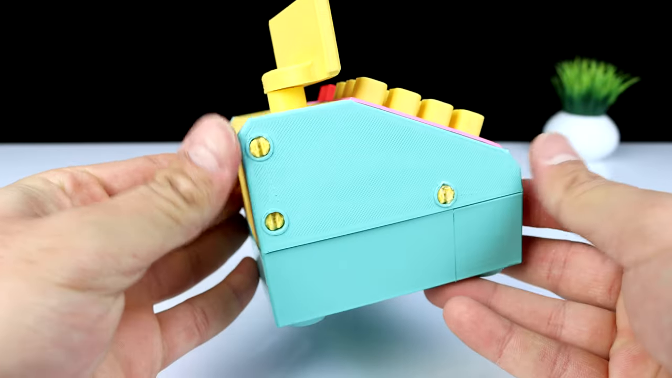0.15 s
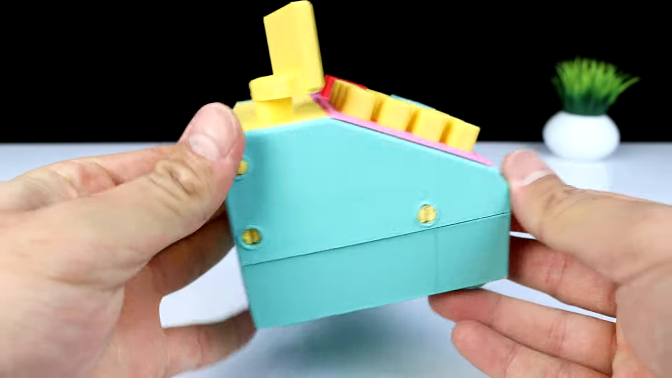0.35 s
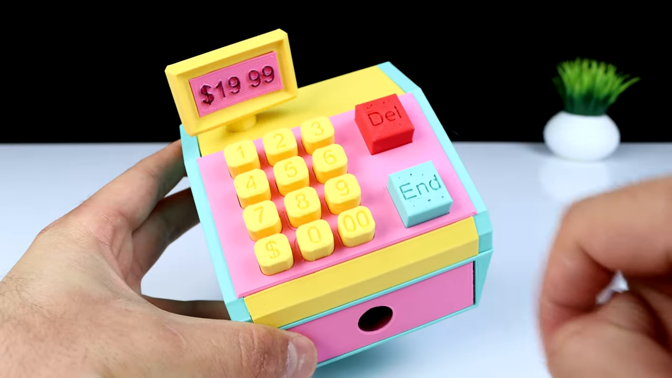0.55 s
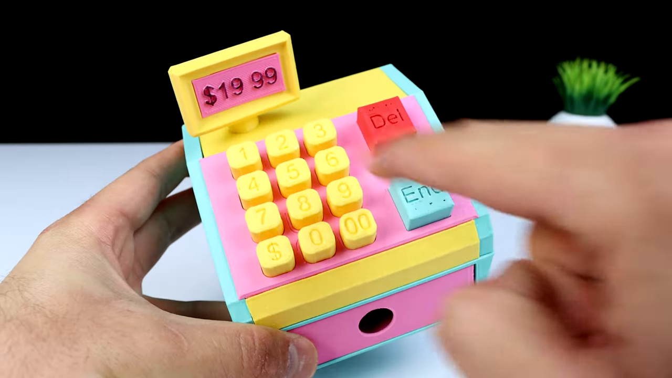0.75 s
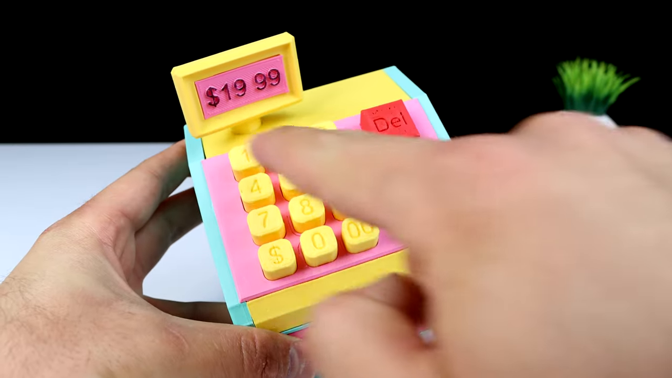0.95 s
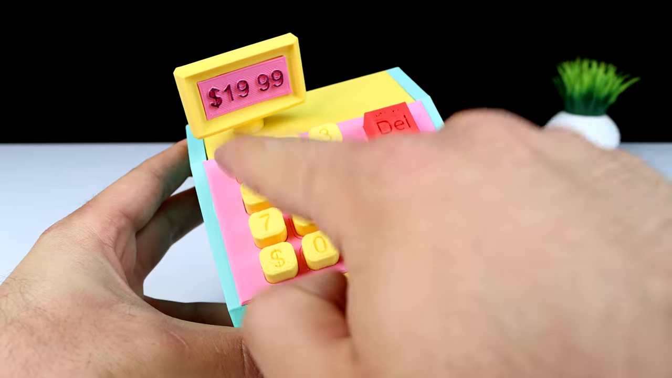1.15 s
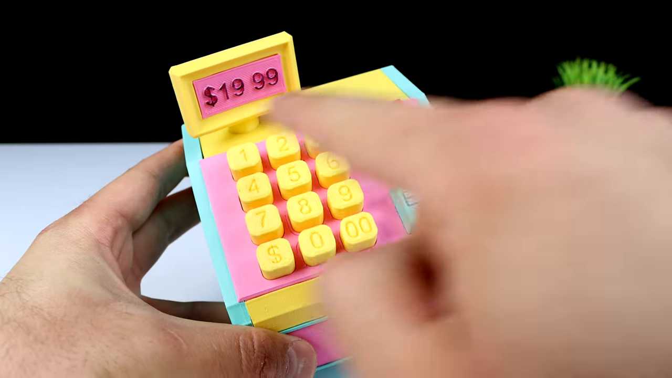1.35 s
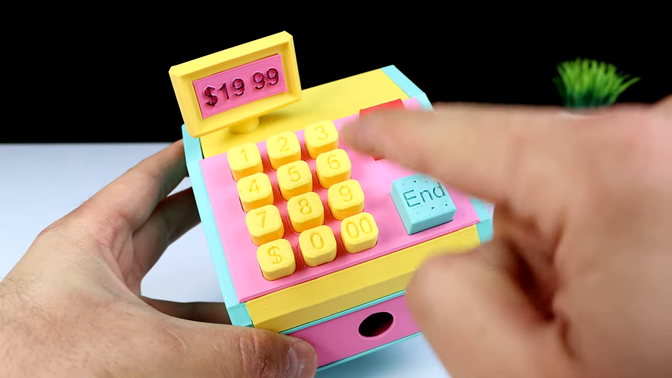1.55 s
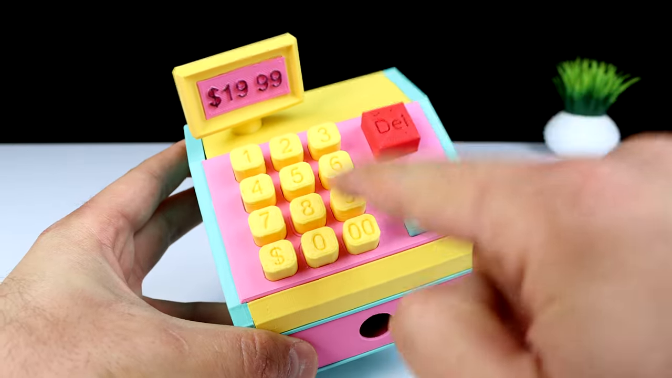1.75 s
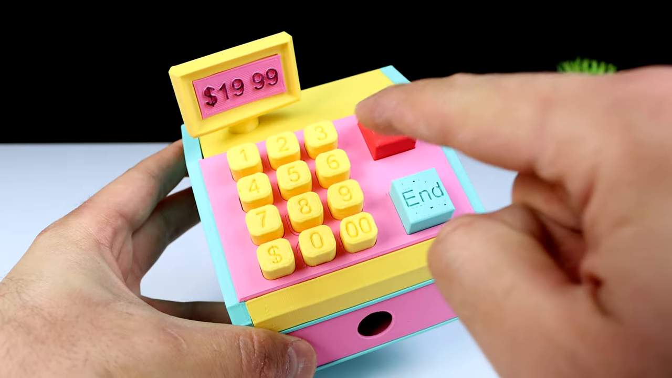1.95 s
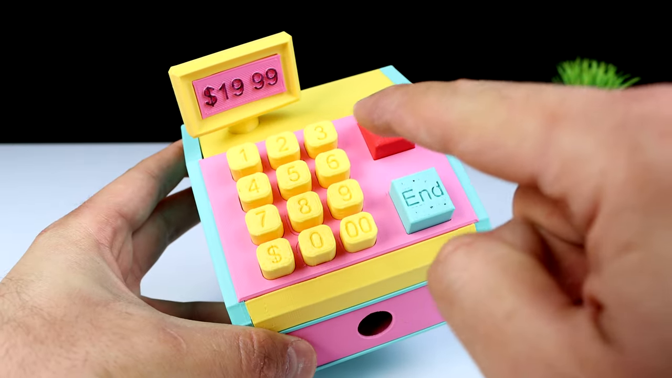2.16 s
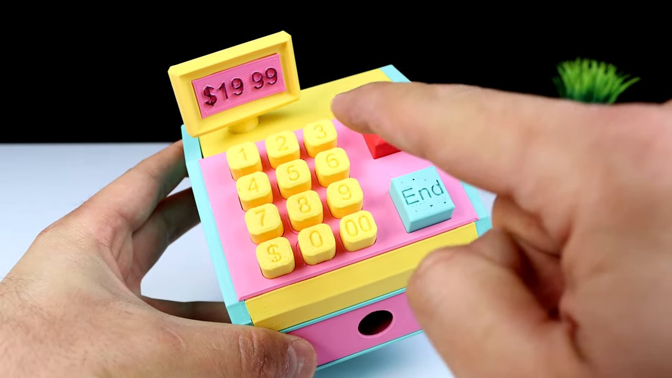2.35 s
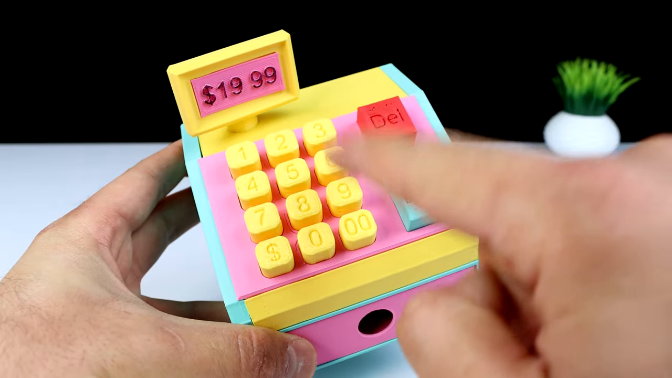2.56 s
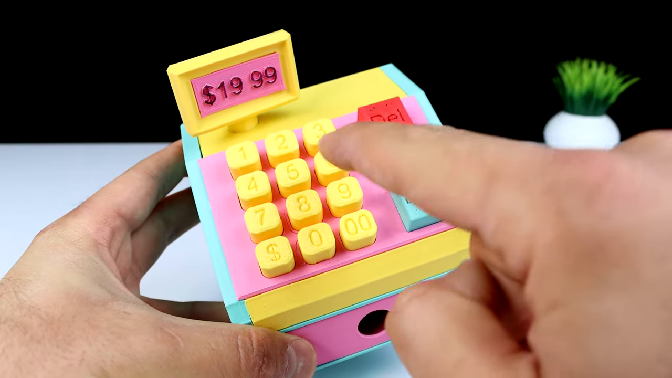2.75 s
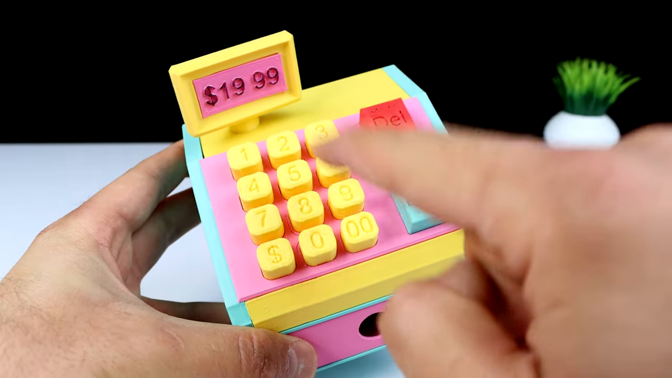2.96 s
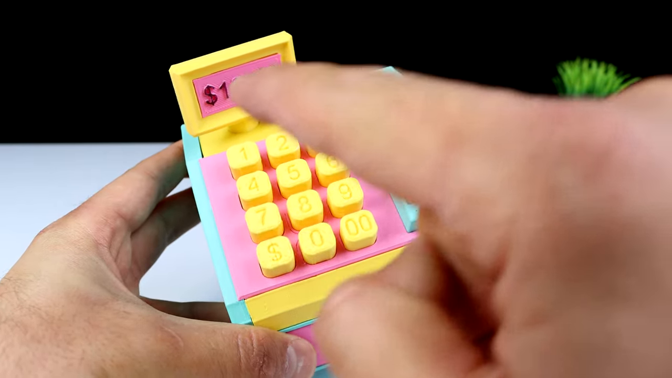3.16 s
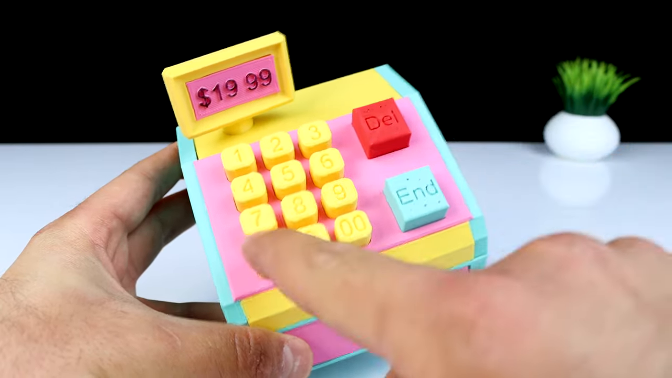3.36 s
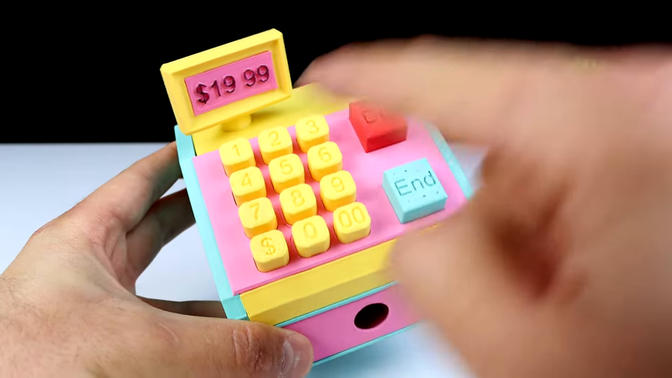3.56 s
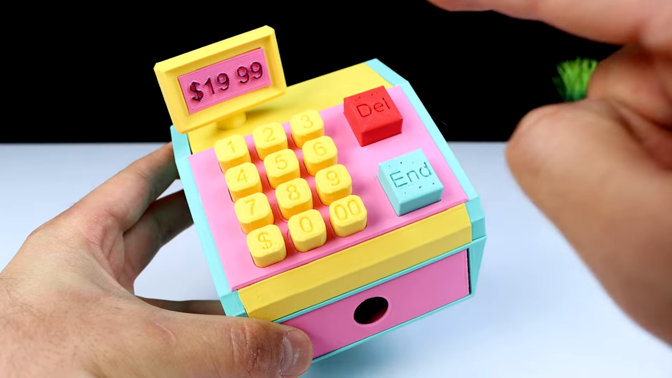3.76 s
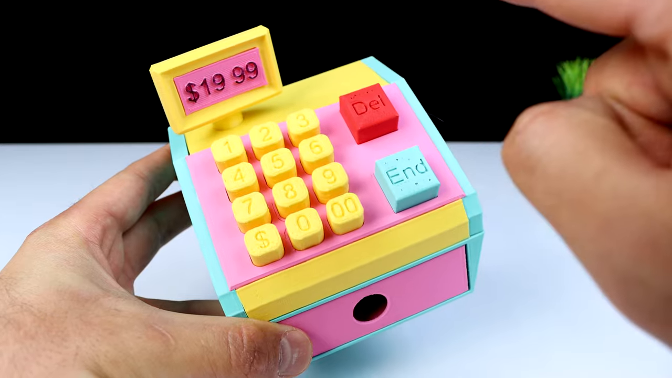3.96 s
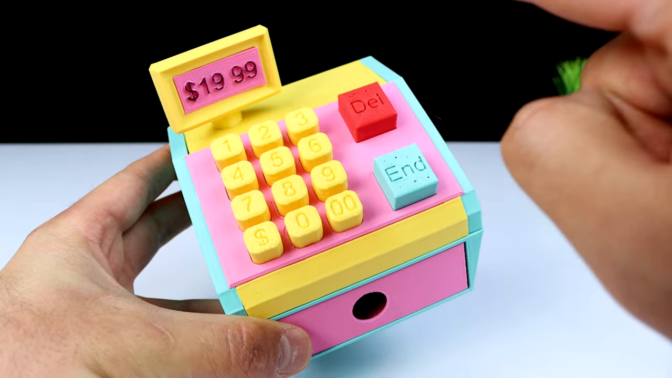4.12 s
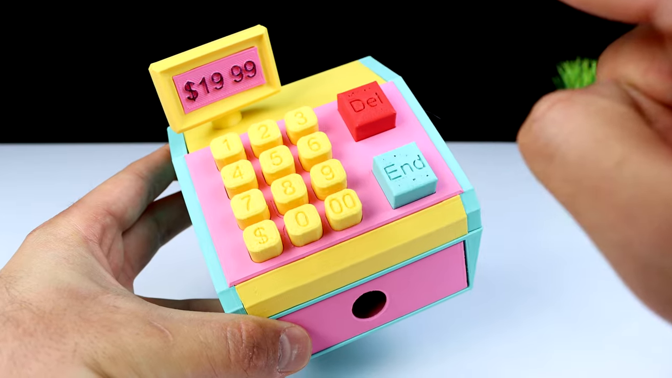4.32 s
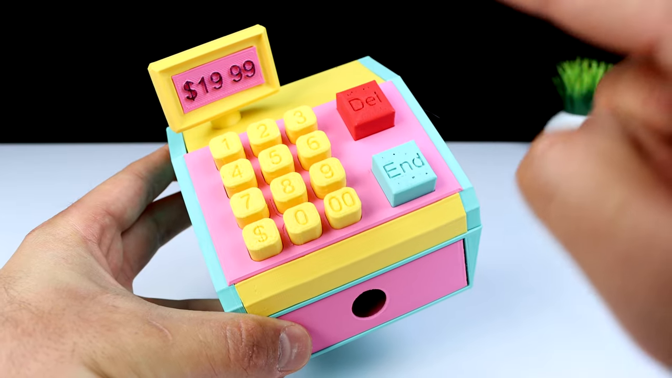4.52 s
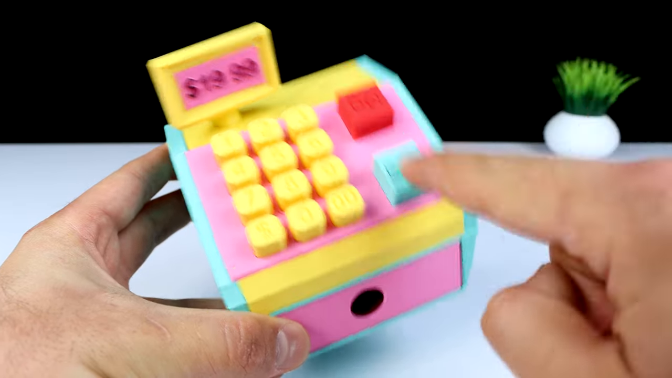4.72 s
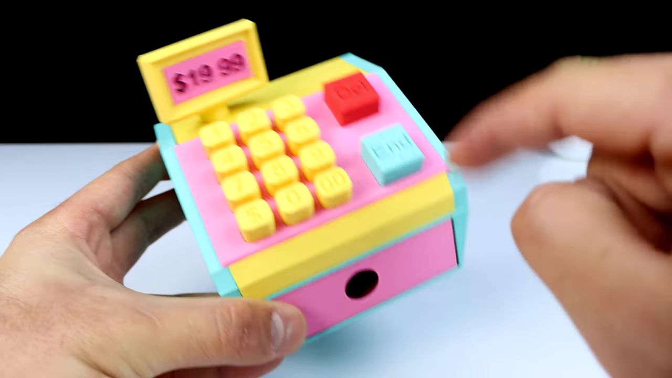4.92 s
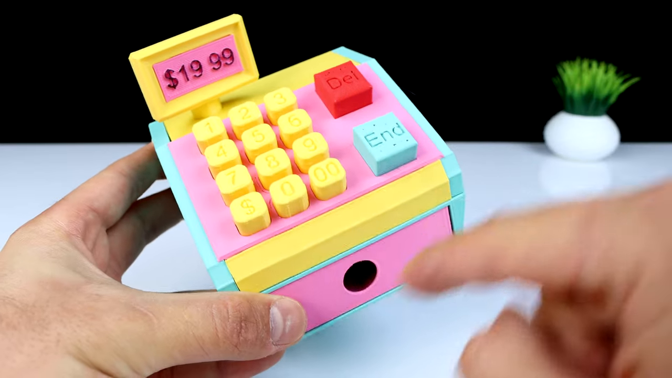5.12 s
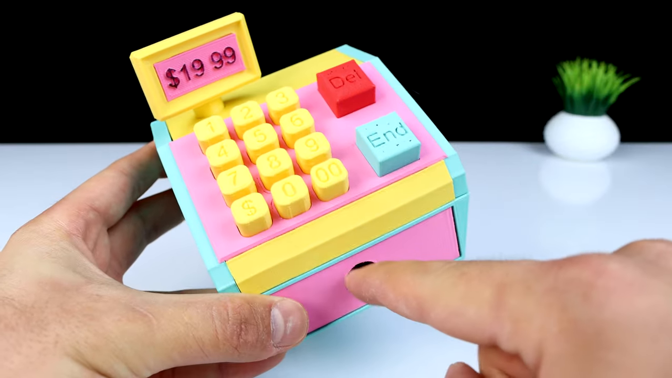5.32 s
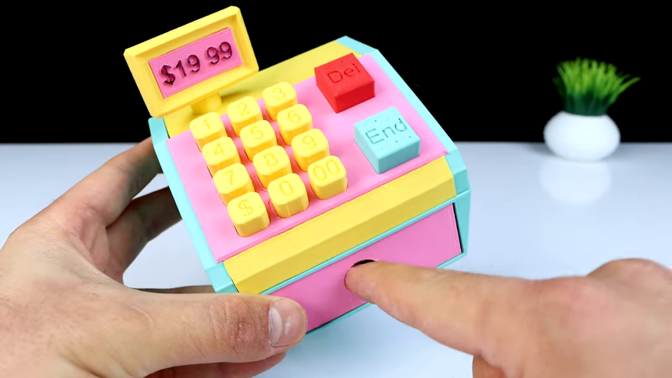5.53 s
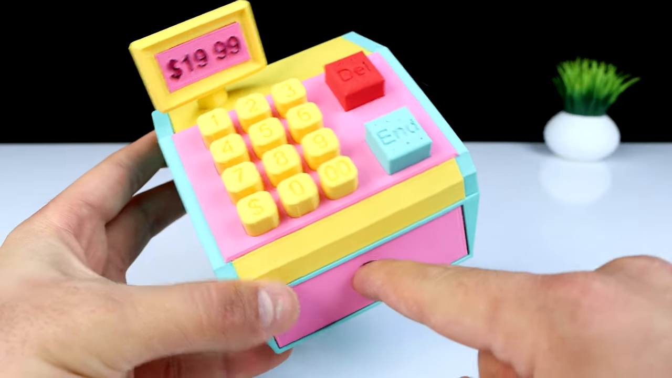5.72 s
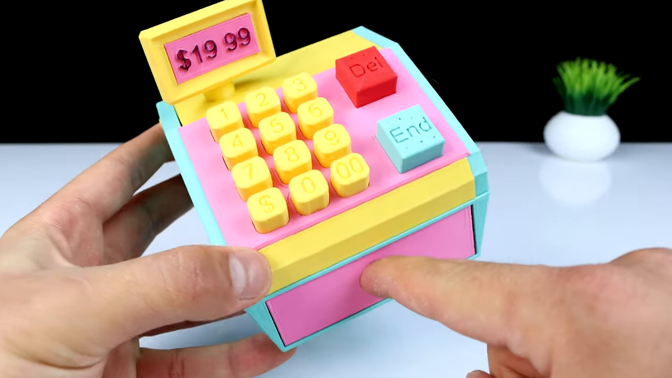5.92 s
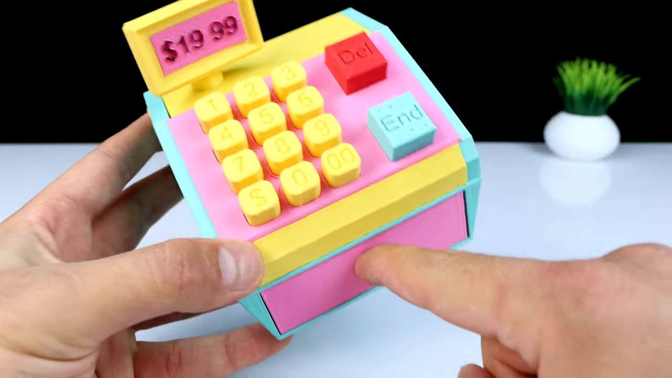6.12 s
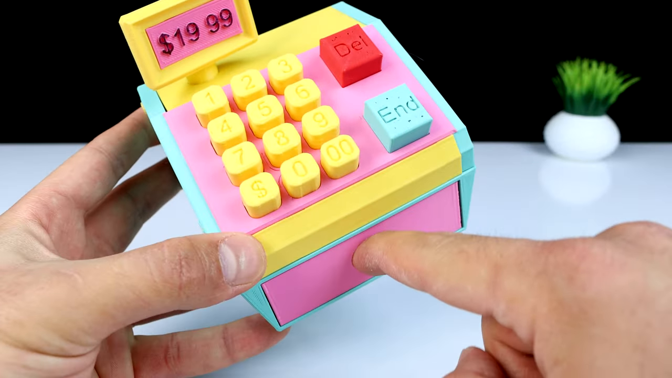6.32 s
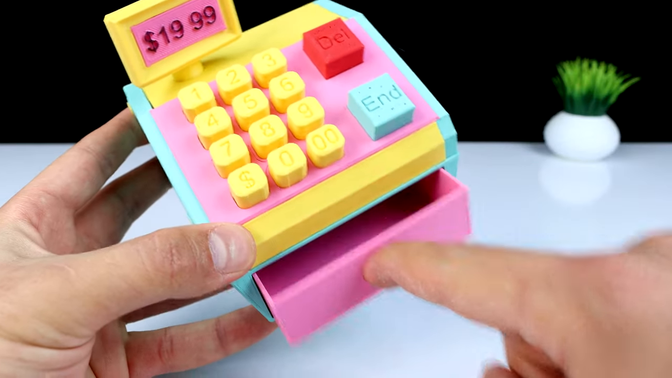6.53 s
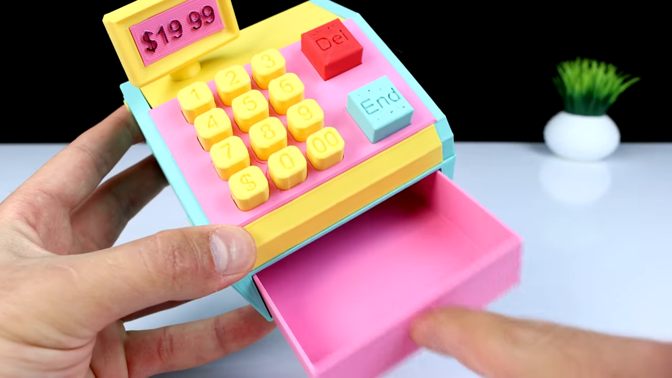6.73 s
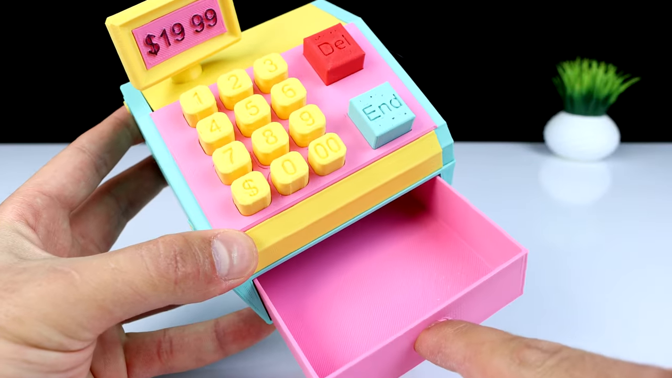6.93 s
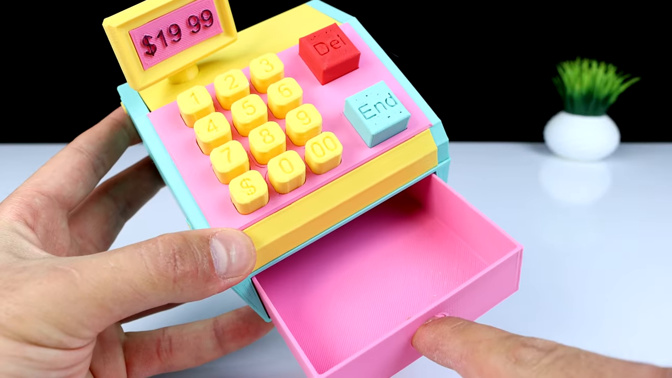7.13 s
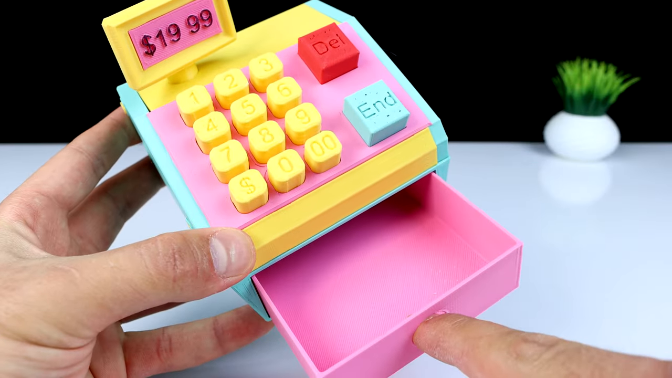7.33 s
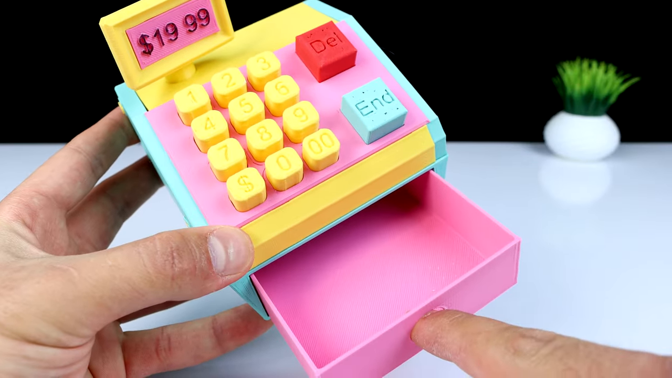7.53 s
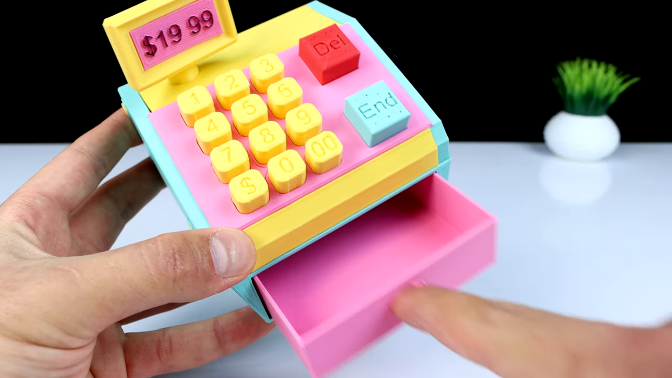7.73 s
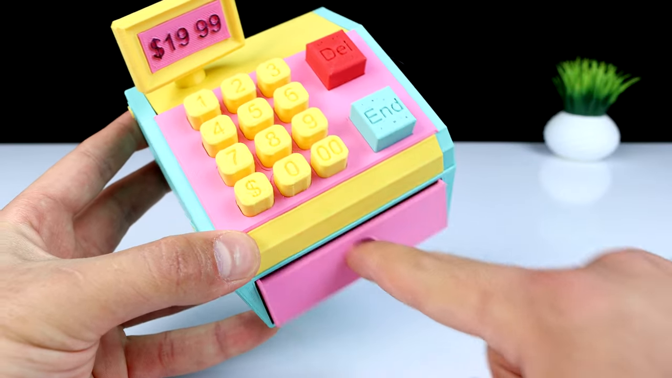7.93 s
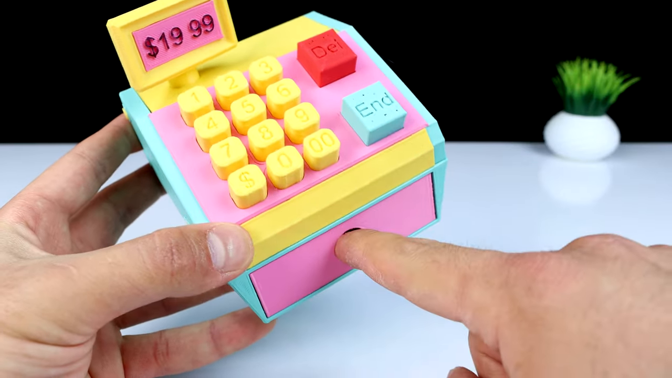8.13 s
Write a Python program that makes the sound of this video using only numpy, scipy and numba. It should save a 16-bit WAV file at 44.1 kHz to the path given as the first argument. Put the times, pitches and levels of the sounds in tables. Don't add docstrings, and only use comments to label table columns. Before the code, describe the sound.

At first there is faint finger rubbing on plastic, then sparse muted key clicks over low room tone. Near the middle comes a much louder hollow click. Fumbling bumps and rubs follow, then a quick, rough drawer scrape with hollow knocks. After a short pause the drawer slides in lightly and shuts with a solid clack, its short echo fading into quiet. Close microphone, small room.

```python
import sys
import numpy as np
from scipy import signal
from scipy.fft import rfft, irfft, next_fast_len
from scipy.io import wavfile
from scipy.ndimage import uniform_filter1d
from numba import njit

SR = 44100
rng = np.random.default_rng(int(sys.argv[2]) if len(sys.argv) > 2 else 0)


def to_wav(sig):
    pcm = np.clip(np.atleast_2d(sig), -1, 1) * 32767
    pcm = np.round(pcm).astype(np.int16)
    wavfile.write(sys.argv[1], SR, pcm.T)


def nominal_scale(level):
    x = np.asarray(level, float) / 20
    return 10 ** x


N = 365147

# frequency in Hz, width in Hz, level in dB.
WALL_MODES = [(190, 40, -10), (280, 44, -0.5), (334.7, 17, -2), (395, 38, -2), (493, 5.7, 6),
              (540, 24.5, 2.5), (710, 80, -6), (726, 100, 2.5), (824, 80, -15)]
# frequency in Hz, width in Hz, level in dB.
RIB_MODES = [(1602, 41, 8.5), (1816, 9.4, 4), (1974, 53, 1), (2170, 63, 1.5), (2309, 160, 3.5),
             (2790, 24, 10.5), (3480, 210, 6.5), (3800, 84, 9), (4300, 82, -0.5), (4480, 80, -33),
             (5300, 79, -16), (5570, 100, -4.5), (6400, 83, -22), (6820, 140, -9.5)]
# frequency in Hz, width in Hz, level in dB.
PANEL_MODES = [(733, 44, 14.5), (830, 8.5, 3), (1009, 85, 14), (1121, 13.3, 18), (1195, 26, 14.5)]


def strokes():
    # frequency in Hz, level in dB per Hz.
    contact_spectrum = [(760, -1), (1300, -3), (1930, -21), (2210, -6), (2550, -3.5), (3490, -7),
                        (5090, -18.5), (12500, -42), (14800, -49)]
    coarse_t = np.arange(N // 8 + 1) * 8 / SR
    boom_db, box_hz, ring_db, panel_hz, rasp_db, rib_hz, hiss_db, air_db = [
        np.repeat(c, repeats=8)[:N] for c in controls(coarse_t)]

    catches = grains(3500, spread_db=2.5, clump_db=2.8)
    cavity = gliding(catches, 2 * np.pi * box_hz / SR, np.exp(-np.pi * 35 / SR))
    shake = nominal_scale(np.minimum(0.18 * (boom_db + 25), -1.5))
    box = rms_one(cavity) + shake * rms_one(body(catches, WALL_MODES))
    boom = rms_one(band(box, 380, 1580) / np.sqrt(1 + shake ** 2))

    panel = touched(catches, PANEL_MODES, panel_hz, reach=0.068, rest=0.11)
    ring = rms_one(panel + nominal_scale(1) * rms_one(band(catches, 697, 990)))

    fine = np.array([grains(2000, spread_db=2.5, clump_db=2) for side in range(2)])
    shared = fine[0] + 0.57 * fine[1] * [[1], [-1]]
    ribs = touched(shared, RIB_MODES, rib_hz, reach=0.14, rest=0.45)
    scrape = rms_one(band(coloured(shared, contact_spectrum), 1500, 5200))
    rasp = rms_one(ribs + nominal_scale(-3) * scrape)
    wide = fine[0] + 0.9 * fine[1] * [[1], [-1]]
    hiss = rms_one(band(coloured(wide, contact_spectrum), 4600, 14000))
    skin_air = rms_one(band(shared, 8000, 14000))

    low = nominal_scale(boom_db) * evened(boom) + nominal_scale(ring_db) * evened(ring)
    high = nominal_scale(rasp_db) * evened(rasp, 30) + nominal_scale(hiss_db) * evened(hiss, 30)
    return low + high + nominal_scale(air_db) * skin_air


def controls(t):
    # time in seconds, load in dB, opening heard in the pitches (0 shut to
    # 1 open), sliding speed in dB.
    drawer = [
        [(6.42, -63, 0.03, -89), (6.478, -47, 0.13, -61), (6.57, -29, 0.11, -35), (6.68, -26.5, 0.79, -35),
         (6.72, -18.5, 0.72, -26.5), (6.78, -19.5, 0.75, -31.5), (6.805, -31.5, 0.8, -32.5),
         (6.855, -24, 0.75, -35.5), (6.9, -53, 0.8, -65)],
        [(7.678, -46, 0, -63), (7.766, -37.5, 0.81, -48), (7.84, -30, 0.88, -41), (7.918, -30, 0.99, -36.5),
         (7.974, -29, 0.5, -36), (8.024, -34, 0.06, -36.5), (8.045, -26.5, 0.6, -45)],
    ]
    # time of full force in
    # seconds, rise in seconds, fall in seconds, level in dB, box pitch in Hz.
    rubs = [(0.125, 0.078, 0.074, -52.5, 652), (0.26, 0.088, 0.1, -53.5, 612),
            (0.365, .06, 0.024, -54.5, 650), (0.44, 0.054, 0.093, -55.5, 626),
            (5.28, 0.061, 0.077, -58.5, 623), (5.49, 0.051, 0.056, -41, 516), (5.585, 0.16, 0.13, -43, 563),
            (5.765, 0.029, 0.081, -44, 495), (5.9, 0.18, 0.53, -56, 557), (1.32, 0.017, .04, -56, 546),
            (1.84, 0.027, 0.034, -59, 560), (2.96, 0.052, .12, -59.5, 526), (3.45, 0.025, 0.06, -53, 384),
            (6.924, 0.037, 0.1, -38, 595), (7.3, 0.021, .07, -58, 524), (7.511, 0.11, 0.13, -54.5, 589)]
    # time of full speed in seconds, rise in seconds,
    # fall in seconds, hiss in dB, rasp in dB.
    slips = [(0.11, 0.057, 0.12, -47.5, -48.5), (0.175, 0.12, 0.065, -45, -49.5),
             (0.23, 0.064, 0.056, -50, -50.5), (0.29, 0.049, 0.039, -56, -58),
             (0.48, 0.24, 0.027, -61, -61.5), (5.5, 0.044, 0.22, -70, -62), (5.59, 0.068, .06, -48.5, -69),
             (5.775, 0.045, 0.17, -41.5, -43), (5.828, .1, 0.036, -41, -46),
             (5.95, 0.054, 0.074, -49, -54.5), (5.99, 0.057, 0.024, -44, -49),
             (6.575, 0.056, 0.23, -39.5, -45), (6.72, 0.079, 0.19, -35, -45),
             (6.83, 0.085, 0.071, -35, -42), (8.02, 0.12, 0.03, -42, -46.5)]
    cavity_shut_hz, cavity_open_hz = 527, 627
    panel_shut_hz, panel_open_hz, panel_rub_hz = 760, 1180, 910
    panel_shut_db, panel_open_db, panel_rub_db = -11, -1, -12
    runner_hiss_db, skin_air_db, rib_hz = -12, -17.5, 1970

    s, load_db, opening, speed_db = np.concatenate(drawer).T
    away = np.min([np.maximum(rows[0][0] - t, t - rows[-1][0]) for rows in drawer], axis=0)
    off_db = -1000 * np.maximum(away, 0)
    load_db = np.interp(t, s, load_db) + off_db
    opening = np.interp(t, s, opening)
    speed_db = np.interp(t, s, speed_db) + off_db

    rub_levels = np.array([db + swell(t, *touch) for *touch, db, hz in rubs])
    rub_db = rub_levels.max(axis=0)
    sliding = load_db > rub_db
    slide_hz = cavity_shut_hz + (cavity_open_hz - cavity_shut_hz) * opening
    box_hz = np.where(sliding, slide_hz, np.array(rubs)[rub_levels.argmax(axis=0), -1])
    contact_hz = panel_shut_hz + (panel_open_hz - panel_shut_hz) * opening
    panel_hz = np.where(sliding, contact_hz, panel_rub_hz)
    slide_ring_db = load_db + panel_shut_db + (panel_open_db - panel_shut_db) * opening
    ring_db = np.maximum(slide_ring_db, rub_db + panel_rub_db)
    hiss_db, rasp_db = np.max([swell(t, *row[:3]) + np.c_[list(row[3:])] for row in slips], axis=0)
    return (np.maximum(load_db, rub_db), box_hz, ring_db, panel_hz,
            np.maximum(speed_db, rasp_db), rib_hz + 0 * t,
            np.maximum(speed_db + runner_hiss_db, hiss_db),
            hiss_db + skin_air_db - 99 * sliding)


def swell(t, s, rise, fall):
    fade_db, roundness = 27, 1.66
    return -fade_db * np.maximum((s - t) / max(rise, 0.005), (t - s) / max(fall, 0.005)) ** roundness


def grains(per_s, spread_db, clump_db):
    sizes = nominal_scale(spread_db * np.minimum(rng.exponential(1, N), 4)) * rng.choice([-1, 1], N)
    return sizes * (rng.random(N) < per_s / SR) * nominal_scale(clump_db * drift(45)) + 1e-18


def touched(x, modes, at_pitch_hz, reach, rest):
    near = [np.exp(-(np.log(at_pitch_hz / hz) / reach) ** 2) + rest for hz, width, db in modes]
    power = sum(n ** 2 * nominal_scale(2 * db) * width for n, (hz, width, db) in zip(near, modes))
    return rms_one(sum(n * body(x, [mode]) for n, mode in zip(near, modes)) / np.sqrt(power))


def evened(x, ms=10):
    power = uniform_filter1d(x ** 2, max(int(ms * SR / 1000), 2))
    return rms_one(x / (np.abs(power) + 0.01) ** (0.78 / 2))


def knocks():
    size = 4410
    out = np.zeros((2, N + size))
    t = np.arange(size) / SR
    for s, sound in [*ticks(t), *thuds(t), *judders(t)]:
        start = round(s * SR)
        out[:, start:start + size] += sound
    return out[:, :N]


def thuds(t):
    # start in seconds, peak in dB, low mode in Hz, ring in ms.
    key_thuds = [(1.765, -34.5, 550, 8.3), (1.806, -36.5, 542, 7.5), (2.691, -36.5, 507, 3.1),
                 (2.923, -28, 503, 4.1), (2.983, -43, 366, 4.8), (3.244, -43.5, 246, 22),
                 (3.424, -31.5, 297, 4), (4.802, -14.5, 520, 12), (4.809, -11.5, 523, 6.3),
                 (4.821, -16.5, 438, 6.9), (4.831, -17, 556, 5.1)]
    # start in seconds, peak in dB, low mode in Hz, upper mode in Hz, upper mode in dB.
    bumps = [(5.455, -20.5, 500, 682, 2), (5.525, -35, 570, 770, 4), (5.749, -25.5, 406, 630, -8),
             (6.073, -26.5, 630, 1020, 2.5), (6.392, -16.5, 318, 636, -1), (6.729, -14, 640, 676, -2),
             (6.774, -5.5, 700, 997, 15), (6.781, -8.5, 616, 710, -1), (6.831, -13.5, 520, 1234, 2),
             (6.854, -20, 662, 655, -19.5), (7.28, -39.5, 500, 1200, -1.5), (7.674, -32.5, 510, 676, -18.5),
             (7.721, -24.5, 487, 1190, -16), (7.768, -18.5, 527, 1230, -19), (8.056, -6, 535, 600, -32),
             (8.062, -7.5, 395, 797, -0.5), (8.069, -9, 466, 696, -16)]
    # frequency in Hz, width in Hz, level in dB.
    base_modes = [(202, 77, -13), (284, 6.4, 9.5), (383.7, 7.1, 4)]
    key_upper_hz, key_upper_db = 794, -17.5
    bump_ring_ms, ring_growth = 6.1, 0.93

    push = np.diff(np.exp(-((t - 0.0018) / 0.00039) ** 2), prepend=0)
    walls = rms_one(body(push, WALL_MODES)) + nominal_scale(-0.5) * rms_one(body(push, PANEL_MODES))
    thump = rms_one(band(np.cumsum(push), 89, 160))
    table = rms_one(body(push, base_modes)) + nominal_scale(-22) * thump
    rows = [(s, db, hz, key_upper_hz, key_upper_db, ms) for s, db, hz, ms in key_thuds]
    rows += [(*row, bump_ring_ms * (row[2] / 550) ** ring_growth) for row in bumps]
    crack = rng.standard_normal((len(rows), len(t))) * (t > 0.0012) * np.exp(-t / 0.0079)
    for (s, peak_db, low_hz, upper_hz, upper_db, ring_ms), noise in zip(rows, crack):
        width = 1000 / np.pi / max(ring_ms, 0.5)
        low = rms_one(resonate(push, low_hz, width))
        upper = rms_one(resonate(push, upper_hz, 0.91 * width))
        modes = low - nominal_scale(upper_db) * upper
        rest = nominal_scale(-10) * walls + nominal_scale(-15) * table + nominal_scale(-15) * rms_one(band(noise, 220, 1980))
        yield s, nominal_scale(peak_db - 2.5) * peak_one(modes + rest)


def ticks(t):
    # start in seconds, peak in dB, key pitch in Hz, snap in dB, rattle in ms.
    key_ticks = [
        (0.405, -55, 2770, -42, 0.54),
        (0.4114, -50, 3950, -47, 1.3),
        (1.255, -42, 1280, -50, 1.6),
        (1.7635, -35.5, 1530, -34.5, 0.29),
        (1.807, -24.5, 1860, -25.5, 0.79),
        (2.6892, -42, 1510, -38, 2.2),
        (2.9225, -54, 2120, -38, 2),
        (3.4247, -46, 2420, -42, 2),
        (4.8007, -36, 1510, -28, 1.8),
        (4.8315, -16, 3360, -23.5, 0.14),
    ]
    # start in seconds, peak in dB, pitch in Hz, snap in dB.
    catches = [(5.457, -31.5, 2170, -70), (5.7257, -49, 1920, -55), (6.0744, -24, 1300, -33),
               (6.3923, -27, 1750, -53), (6.563, -23, 2120, -34), (6.6845, -33, 2380, -51),
               (6.7191, -29, 1850, -50), (6.775, -22, 2700, -45), (6.815, -23, 3350, -26),
               (7.2818, -47, 2230, -71), (7.7373, -36.5, 3130, -62), (7.889, -41, 1950, -53),
               (8.064, -37, 4300, -47), (8.0583, -17.5, 1530, -47), (8.0654, -14.5, 1950, -56)]
    # start in seconds, peak in dB, key pitch in Hz, snap in dB.
    scuffs = [(0.483, -44, 1580, -52), (1.311, -44, 3180, -46), (2.736, -57, 1570, -57),
              (2.979, -60, 1530, -55), (3.485, -43.5, 1490, -45.5)]
    # start in seconds, peak in dB, snap in dB.
    skips = [(6.629, -48, -44), (6.698, -32, -48), (6.742, -32, -46), (6.792, -28, -46), (7.751, -34, -49),
             (7.769, -32, -54), (7.808, -36, -52), (7.853, -42, -52), (7.932, -41, -52), (7.978, -43, -52),
             (7.904, -48, -50), (7.993, -50, -34), (8.027, -45, -40), (8.057, -36, -31.5)]
    skip_hz = 3460

    rows = [(*row, 4300) for row in key_ticks]
    rows += [(*row, 1.86, 4610) for row in catches]
    rows += [(*row, 7.3, 4730) for row in scuffs]
    rows += [(s, db, skip_hz, snap_db, 1.3, 8080) for s, db, snap_db in skips]
    noise = rng.standard_normal((len(rows), 2, len(t)))
    for (s, peak_db, key_hz, snap_db, rattle_ms, snap_hz), (a, b) in zip(rows, noise):
        u = t * 1000 / max(rattle_ms, 0.3)
        rise = 1 - np.exp(-u * 20 / rattle_ms ** 1.5)
        chatter = nominal_scale(-19.5) * np.exp(-t / 0.012)
        rattle = (a + 0.51 * b * [[1], [-1]]) * rise * (np.exp(-u) + chatter)

        key = rms_one(resonate(rattle, key_hz, 290 / rattle_ms ** 0.9))
        key = key + nominal_scale(-3) * rms_one(band(body(rattle, RIB_MODES), 1300, 5500))
        key = key + nominal_scale(-12.5) * rms_one(band(rattle, 800, 4500))
        snap = rms_one(resonate(rattle, snap_hz, 1300 / rattle_ms ** 0.8))
        snap = snap + nominal_scale(-3) * rms_one(band(rattle, 4000, 7500))
        snap = snap + nominal_scale(-9) * rms_one(band(rattle, 6200, 10000))
        yield s, nominal_scale(peak_db) * peak_one(key) + nominal_scale(snap_db + 3) * peak_one(snap)


def judders(t):
    # start in seconds, peak in dB, mode in Hz, length in ms.
    mode_swells = [(6.502, -33, 583, 9.3), (6.517, -28, 475, 14), (6.543, -27.5, 577, 19),
                   (6.579, -25, 568, 14), (6.593, -28, 565, 13), (6.610, -31, 555, 8.7),
                   (6.638, -19, 496, 19), (6.665, -21.5, 559, 12), (6.695, -18, 632, 52),
                   (6.697, -23, 866, 14.3), (6.722, -16, 1027, 20), (6.745, -16, 649, 26),
                   (6.768, -8.5, 1006, 20), (6.772, -11, 634, 28.8), (6.846, -20, 1195, 18),
                   (6.556, -38, 2228, 63), (6.682, -28.5, 2280, 8), (6.692, -27, 2340, 11),
                   (6.716, -22, 2170, 13), (6.725, -27.5, 1794, 26), (6.700, -31, 3466, 11),
                   (6.783, -29, 3380, 13), (6.620, -34.5, 3800, 9), (6.772, -25.5, 2750, 9.9),
                   (6.640, -26, 1125, 32), (6.798, -23, 1000, 18), (6.843, -39.5, 3400, 24),
                   (7.692, -36, 510, 12), (7.743, -34, 1195, 21), (7.783, -25, 540, 8.2),
                   (7.794, -23, 523, 10), (7.808, -26, 574, 12.4), (7.812, -37, 1195, 15),
                   (7.832, -28, 1195, 40), (7.904, -26, 1195, 17), (7.931, -29, 1195, 28),
                   (7.946, -28, 778, 37), (7.966, -35, 590, 16), (7.994, -26.5, 572, 9.9),
                   (8.029, -28, 600, 13), (7.768, -39, 1870, 12), (7.790, -41, 1820, 16),
                   (7.945, -48, 3800, 10), (7.958, -51, 3830, 12), (7.976, -43, 3560, 10),
                   (4.806, -35.5, 1500, 13), (4.808, -23.5, 975, 11.4), (4.838, -42, 963, 44),
               (4.850, -42, 294, 50), (4.882, -39.5, 552, 26), (4.913, -46, 419, 45),
               (4.955, -39.5, 580, 25), (5.478, -36.5, 507, 20), (5.522, -36, 545, 18),
               (5.568, -35.5, 706, 24), (5.612, -36, 433, 20), (5.795, -48, 2000, 36),
               (6.192, -57, 393, 60), (8.060, -47, 4300, 10), (8.062, -32, 3740, 5), (8.061, -33, 2720, 6),
               (2.920, -49, 106, 35), (3.420, -47, 95, 40), (4.800, -45, 110, 34), (5.829, -55, 251, 78),
               (6.691, -35.5, 190, 55), (4.800, -20.5, 519, 15.6), (4.840, -32, 401, 40),
               (8.060, -24, 1050, 16), (4.812, -20, 560, 16), (6.545, -34.5, 315, 40),
               (5.530, -42.5, 640, 90), (8.077, -29, 277, 30), (8.085, -27, 426, 38),
               (8.140, -37.5, 475, 47), (8.141, -37, 284, 26), (8.205, -39, 516, 26),
               (0.230, -54, 612, 100), (0.390, -62, 598, 66)]
    rise_share, roughness = 0.33, 0.24

    rows = mode_swells
    noise = rng.standard_normal((len(rows), len(t)))
    phases = rng.uniform(0, 2 * np.pi, len(rows))
    for (s, peak_db, hz, length_ms), rough, phase in zip(rows, noise, phases):
        u = np.clip(t * 1000 / max(length_ms, 2), 0, 1)
        shape = np.sin(np.pi / 2 * np.minimum(u / rise_share, (1 - u) / (1 - rise_share))) ** 2
        tone = np.sin(2 * np.pi * hz * t + phase)
        tone = tone + roughness * (1 + hz / 2400) * rms_one(resonate(rough, hz, 0.1 * hz))
        yield s, nominal_scale(peak_db) * shape * tone


def creaks():
    # start in seconds, end in seconds, pitch in Hz, level in dB, width in Hz.
    whines = [(0.025, 0.13, 860, -63, 10), (3.78, 3.89, 1050, -65, 15), (3.78, 3.89, 1410, -69, 10),
              (5.07, 5.176, 882, -65, 15), (5.32, 5.46, 728, -61, 25), (5.43, 5.65, 2170, -58, 160),
              (5.54, 5.67, 1880, -61, 40), (0.055, 0.14, 1560, -63, 40), (7.05, 7.5, 860, -67, 50),
              (0.45, 1.1, 975, -67, 220), (0.5, 0.8, 1350, -68, 200), (0.5, 1.1, 390, -65, 90),
              (5.95, 6.2, 385, -61, 40)]
    t = np.arange(N) / SR
    out = np.zeros(N)
    for start, end, hz, db, width in whines:
        shape = np.sqrt(np.clip(np.minimum(t - start, end - t) / 0.046, 0, 1))
        out += nominal_scale(db) * shape * rms_one(resonate(rng.standard_normal(N), hz, width))
    return out


def room(x, wet_db, unlike):
    # frequency in Hz, phase in radians.
    toy_phase = [(0, 0), (4050, 0.2845), (8960, -2.5), (9910, 0.5), (10900, -3), (11800, 5), (13700, -5),
                 (14600, 24)]
    # frequency in Hz, level difference in dB.
    toy_balance = [(60, 3.5), (180, -2), (540, -1.0), (1610, -3.5), (4810, -2), (14400, -1)]
    # frequency in Hz, time to fall 60 dB in seconds.
    decay_times = [(150, 0.71), (600, 0.49), (2000, 0.34), (8000, 0.14)]

    size = next_fast_len(N + SR)
    hz = np.fft.rfftfreq(size, 1 / SR)
    echoes = np.zeros((2, len(hz)), complex)
    for k, lag in enumerate(rng.uniform(0.013, 0.061, 28)):
        loop = nominal_scale(-60 * lag / at_hz(decay_times, hz)) * np.exp(-2j * np.pi * hz * lag)
        echoes[k % 2] += (-1) ** (k // 2) * loop / (1 - loop)
    for lag in rng.uniform(0.00085, 0.006, 3):
        turn = np.exp(-2j * np.pi * hz * lag)
        echoes = echoes * (turn - 0.6) / (1 - 0.5 * turn)
    wet = echoes[0] + unlike * echoes[1] * np.minimum(hz / 1240, 1) * [[1], [-1]]
    lean = nominal_scale(at_hz(toy_balance, hz) / 2) * np.exp(0.5j * at_hz(toy_phase, hz))
    spectrum = rfft(x, size)
    direct = spectrum * [lean, 1 / lean]
    return irfft(direct + nominal_scale(wet_db) * wet * spectrum.mean(axis=0), size)[:, :N]


def air():
    # frequency in Hz, level in dB per Hz.
    air_spectrum = [(13, -48), (22, -62), (46, -9.5), (86, -10), (195, -4), (336, -7.5), (466, -11),
                    (520, -8.5), (946, -13), (1060, -12), (1180, -14.5), (1390, -14.5), (1550, -15.5),
                    (13700, -29.5), (14800, -39)]
    # frequency in Hz, width in Hz, level in dB.
    machine_hum = [(60.8, 12, -67.5), (148.6, 4.5, -67), (192, 9.4, -68.5), (253, 9.3, -70)]
    # frequency in Hz, left-right likeness (1 is equal).
    likeness = [(60, 0.46), (150, 0.8), (370, 0.62), (930, 0.18), (2320, -2), (5780, 0.2), (14400, -2)]
    air_db = -58

    alike = np.clip(at_hz(likeness, np.fft.rfftfreq(N, 1 / SR)), 0, 1)
    mid, side = rfft(coloured(rng.standard_normal((2, N)), air_spectrum))
    both = np.sqrt(1 + alike) * mid + np.sqrt(1 - alike) * side * [[1], [-1]]
    noise = rms_one(irfft(both, N))
    hum = sum(nominal_scale(db) * rms_one(resonate(rng.standard_normal(N), hz, width))
              for hz, width, db in machine_hum)
    return (nominal_scale(air_db + 0.5 * drift(0.33)) * noise + hum) * nominal_scale(np.array([[-0.4], [0.4]]))


def drift(rate):
    r = np.exp(-2 * np.pi * rate / SR)
    return rms_one(signal.lfilter([1], [1, -2 * r, r * r], rng.standard_normal(N + SR))[SR:])


def body(x, modes):
    return sum((-1) ** k * nominal_scale(db) * resonate(x, hz, width) for k, (hz, width, db) in enumerate(modes))


def resonate(x, hz, width_hz):
    r = np.exp(-np.pi * width_hz / SR)
    poles = [1, -2 * r * np.cos(2 * np.pi * hz / SR), r * r]
    return signal.lfilter([(1 - r * r) / 2, 0, (r * r - 1) / 2], poles, x)


@njit
def gliding(x, turn, r):
    y = np.zeros(len(x))
    for i in range(2, len(x)):
        y[i] = x[i] - x[i - 2] + 2 * r * np.cos(turn[i]) * y[i - 1] - r * r * y[i - 2]
    return y


def band(x, low_hz, high_hz):
    return signal.sosfilt(signal.butter(2, [low_hz, high_hz], "band", fs=SR, output="sos"), x)


def coloured(x, spectrum):
    return irfft(rfft(x) * nominal_scale(at_hz(spectrum, np.fft.rfftfreq(N, 1 / SR))), N)


def at_hz(points, hz):
    return np.interp(np.log(hz + 1e-9), np.log(np.array(points)[:, 0]), np.array(points)[:, 1])


def rms_one(x):
    return x / np.sqrt(np.mean(x ** 2) + 1e-20)


def peak_one(x):
    return x / np.abs(x).max()


def scene():
    return room(strokes() + knocks() + creaks(), wet_db=-22, unlike=0.93) + air()


def low_pass(x):
    return signal.sosfilt(signal.butter(12, 15000, fs=SR, output="sos"), x)


def record(dry):
    notched = dry - resonate(dry, 9860, width_hz=390)
    cut = signal.sosfilt(signal.butter(12, 14300, fs=SR, output="sos"), notched)
    return low_pass(2.447 * np.tanh(cut / 2.563))


dry = scene()
out = record(dry)
to_wav(out)
```